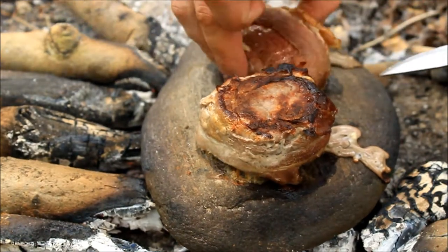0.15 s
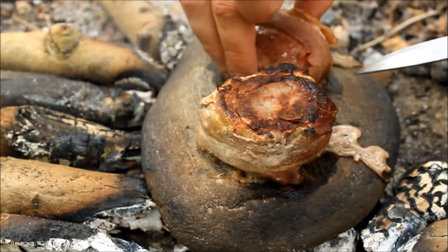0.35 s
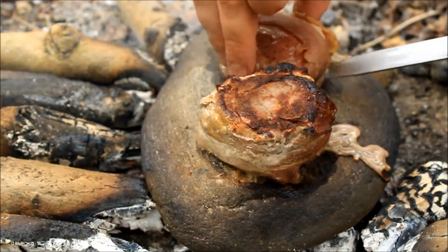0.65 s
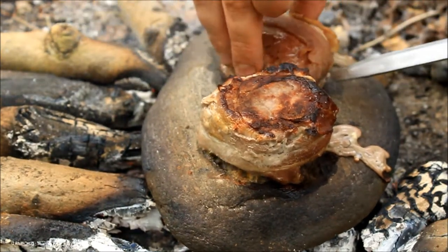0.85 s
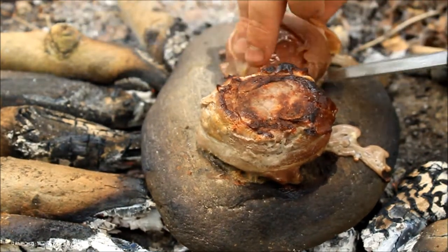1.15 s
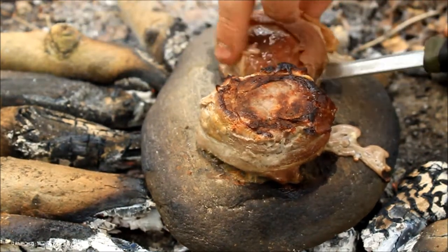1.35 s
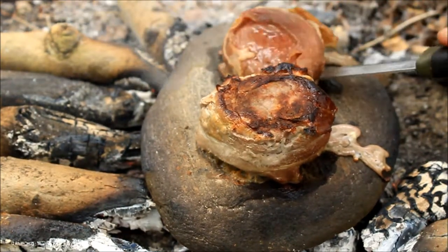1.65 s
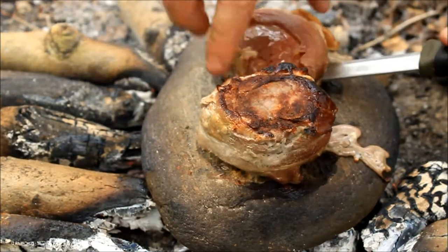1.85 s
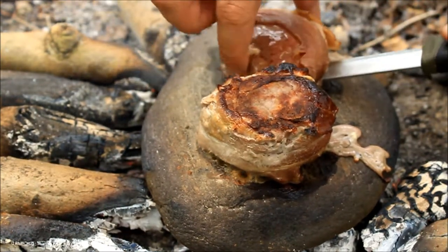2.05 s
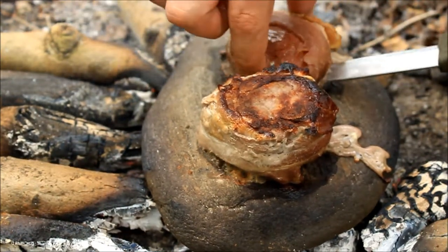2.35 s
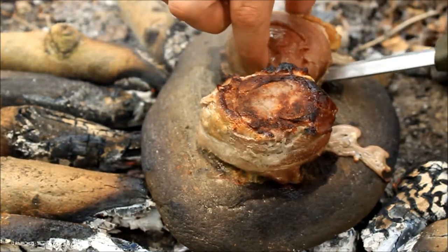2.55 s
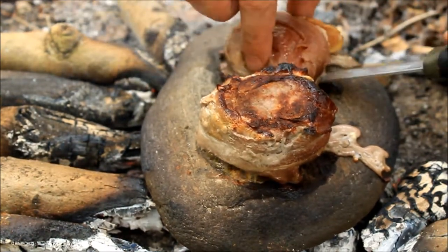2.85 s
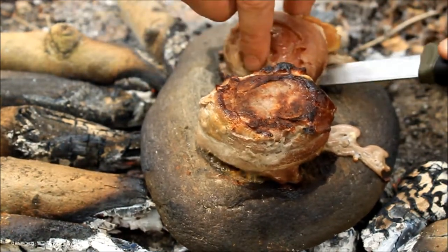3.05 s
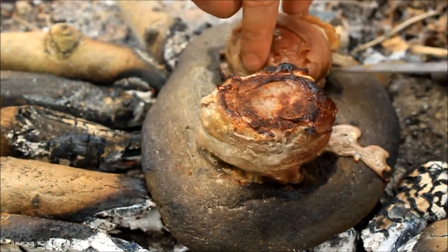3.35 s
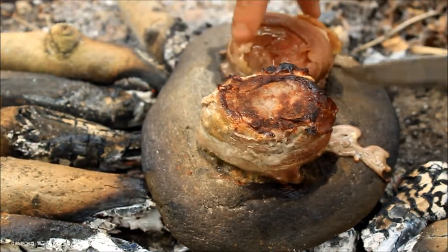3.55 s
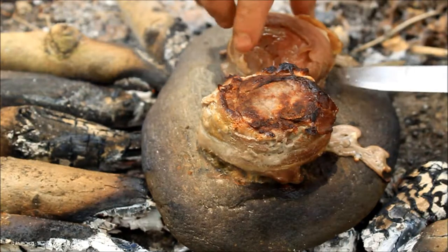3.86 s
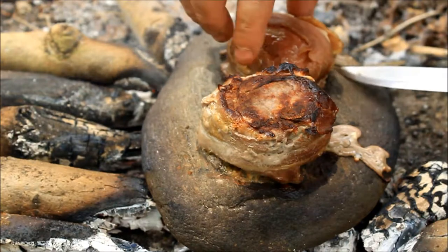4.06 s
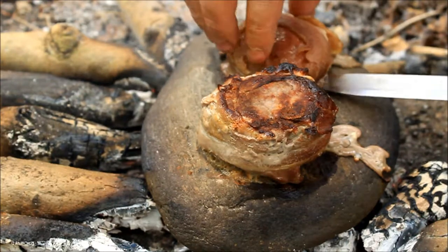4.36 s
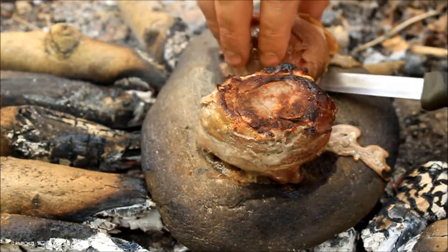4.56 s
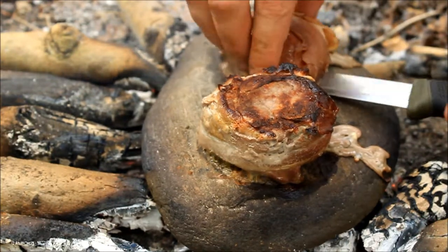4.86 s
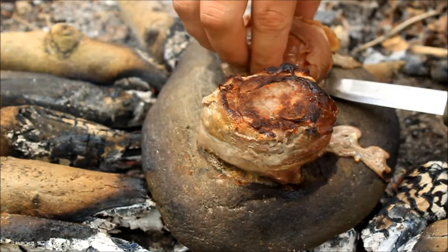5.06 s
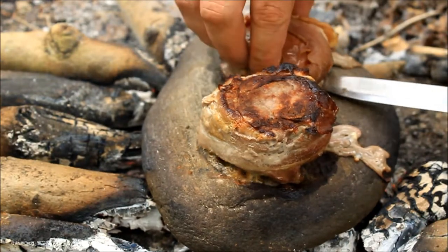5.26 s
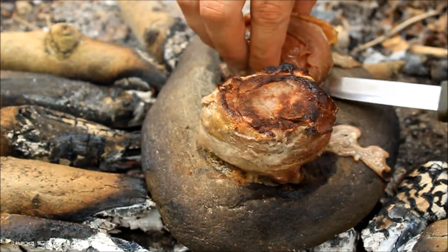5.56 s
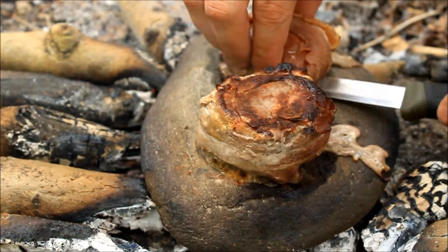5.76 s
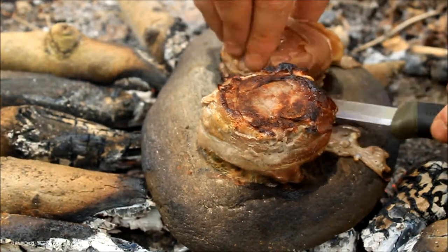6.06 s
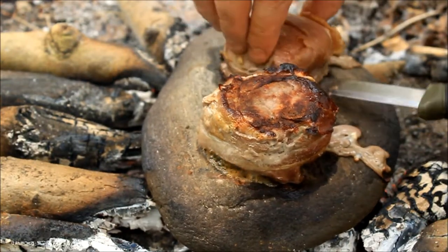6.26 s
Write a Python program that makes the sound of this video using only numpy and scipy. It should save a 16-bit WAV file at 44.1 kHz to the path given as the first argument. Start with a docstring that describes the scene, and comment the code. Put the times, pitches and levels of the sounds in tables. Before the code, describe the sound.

Meat sizzles steadily on a hot stone outdoors, spitting fat and puffing steam, while a knife scrapes briefly and low wind rumbles.

```python
"""Meat fries on a hot stone in the embers of a campfire: from the start, clusters of tiny clicks make bubbling
juice, sizzle and fine spray, with spitting droplets, puffs of steam and flare-ups as the meat is pressed down.
From about 1 s puffs of wind, made of low noise, rumble over a slowly growing breeze and faint outdoor air.
A knife catches on the stone from 1.5 s (clicks ringing in the blade) and its tip ticks twice near 3.7 s (short tones).
From 4.3 s it slides under the meat three times with a low drone of noise, and scrapes hardest near 6 s."""
import sys
import numpy as np
from scipy import signal
from scipy.fft import rfft, irfft, next_fast_len
from scipy.io import wavfile
from scipy.ndimage import uniform_filter1d

SR = 44100
rng = np.random.default_rng(int(sys.argv[2]) if len(sys.argv) > 2 else 0)


def bounce(signal):
    """Save signal as a 16-bit WAV file at the path given by the first command-line argument."""
    frames = np.transpose(np.atleast_2d(signal))
    limited = np.clip(frames, -1, 1)
    pcm = np.round(limited * 32767).astype(np.int16)
    wavfile.write(sys.argv[1], SR, pcm)


N = 283120
TIME = np.arange(N) / SR


def from_db(db):
    """Turn decibels into a gain factor."""
    return 10 ** (np.asarray(db) / 20)


def rms_one(x):
    """Scale the whole sound to an rms of 1."""
    return x / np.sqrt(np.mean(x ** 2) + 1e-20)


def even(x, size=6000):
    """Scale to a running rms of 1 over size samples; the fine grain stays."""
    return x / np.sqrt(uniform_filter1d(x ** 2, size=size) + 1e-20)


def in_time(rows):
    """Draw straight lines between the rows, to get each column at every sample."""
    times, *columns = np.transpose(rows)
    return [np.interp(TIME, times, column) for column in columns]


def swell(start, length, attack_s, release_s):
    """An envelope that rises to 1 at start, holds for length and dies away."""
    early = np.maximum(start - TIME, 0)
    late = np.maximum(TIME - start - length, 0)
    return np.exp(-(early / attack_s) ** 2 - (late / release_s) ** 2)


def bump(peak, length):
    """A bell-shaped envelope of height 1; at half a length from its peak it is 4.3 dB down."""
    return np.exp(-2 * ((TIME - peak) / length) ** 2)


def drift(rate):
    """A smooth random curve of rms about 1 that changes about rate times a second."""
    step = 20  # samples between the computed points
    r = np.exp(-2 * np.pi * rate * step / SR)
    noise = rng.standard_normal(N // step + 2002)
    slow = signal.lfilter([1], [1, -2 * r, r * r], noise)[2000:]  # skip the filter's run-in
    return np.interp(np.arange(N) / step, np.arange(len(slow)), rms_one(slow))


def colour(x, spectrum):
    """Minimum-phase filter through (Hz, dB) points, so nothing sounds early; it falls away below the first."""
    size = next_fast_len(2 * len(x), real=True)
    size += size % 2
    hz = np.maximum(np.fft.rfftfreq(size, 1 / SR), 1)
    at, db = np.transpose(spectrum)
    gain = from_db(np.interp(np.log(hz), np.log(at), db))
    gain = gain * np.minimum(hz / at[0], 1)
    # folding the cepstrum forward in time gives minimum phase
    cepstrum = irfft(np.log(gain))
    cepstrum[1:size // 2] *= 2
    cepstrum[size // 2 + 1:] = 0
    return irfft(rfft(x, size) * np.exp(rfft(cepstrum)))[:len(x)]


def cut(x, hz, kind, order=4):
    """Butterworth filter."""
    sections = signal.butter(order, hz, kind, fs=SR, output="sos")
    return signal.sosfilt(sections, x + 1e-18)


def resonate(x, hz, width_hz):
    """One resonance with a gain of 1 at its top."""
    r = np.exp(-np.pi * width_hz / SR)
    top = np.array([1, 0, -1]) * (1 - r * r) / 2
    bottom = [1, -2 * r * np.cos(2 * np.pi * hz / SR), r * r]
    return signal.lfilter(top, bottom, x + 1e-18)


LARGEST_BURST = 4.6  # limit on a burst's random size, in steps of spread_db


def bursts(per_s, spread_db, clump_db, clump_rate=90):
    """Random clicks, many small and few large, that come in brief clumps."""
    born = rng.random(N) < per_s * from_db(clump_db * drift(clump_rate)) / SR
    sizes = from_db(spread_db * np.minimum(rng.exponential(1, N), LARGEST_BURST))
    signs = rng.choice([-1, 1], N)
    return rms_one(born * sizes * signs)


# colour of the still outdoor air, same on both sides: (frequency [Hz], relative level [dB per Hz])
AIR_COLOUR = [(20, 0.5), (60, -10), (150, -2.5), (330, -3.5), (520, -3), (800, -9), (1500, -12),
              (5000, -39.5)]
# colour of a very faint noise, opposite in left and right: (frequency [Hz], relative level [dB per Hz])
SIDE_NOISE_COLOUR = [(40, -7.5), (130, 7.5), (300, 3), (600, -1), (1100, -15.5), (2200, -34), (4500, -35),
                     (13000, -24)]
AIR_DB, SIDE_NOISE_DB = -72, -86.5


def air():
    """Faint outdoor air, plus very faint noise, opposite in left and right, that widens the sound slightly."""
    mid = rms_one(colour(rng.standard_normal(N), AIR_COLOUR))
    side = rms_one(colour(rng.standard_normal(N), SIDE_NOISE_COLOUR))
    left_right = np.array([[1], [-1]])
    return from_db(AIR_DB) * mid + from_db(SIDE_NOISE_DB) * side * left_right


# colour of the wind's rumble: (frequency [Hz], relative level [dB per Hz])
RUMBLE_COLOUR = [(18, -5), (25, 1), (35, 0), (50, -5.5), (85, -13.5), (130, -24), (250, -42), (600, -82.5)]
# the breeze between the puffs slowly freshens: (time [s], level before flutter [dB])
BREEZE_LEVELS = [(0, -82), (0.9, -78), (3.2, -76.5), (6.42, -68.5)]
# puffs of wind: (time of the peak [s], length [s], level [dB])
WIND_PUFFS = [(0.85, 0.25, -69), (1.47, .05, -64.5), (1.632, 0.086, -60.5), (2.11, 0.12, -59),
              (2.506, 0.22, -61), (3.0, 0.18, -61), (3.427, 0.081, -55.5), (3.54, 0.067, -55.5),
              (3.65, .05, -58), (3.834, 0.17, -52.5), (4.093, .06, -58), (4.46, 0.25, -63.5),
              (4.654, 0.15, -52), (4.837, 0.095, -56), (5.18, 0.13, -47.5), (5.566, 0.32, -59.5),
              (6.02, 0.18, -55), (6.302, 0.088, -57)]
PUFF_RISE_SHARE, PUFF_FALL_SHARE = 0.51, 0.58  # of a puff's length


def wind(flutter_db=3.0):
    """Eddies rumble on the microphone, as strong as the breeze and the puffs that carry them."""
    breeze_db, = in_time(BREEZE_LEVELS)
    breeze = from_db(breeze_db + flutter_db * drift(6))
    puffs = sum(from_db(db) * swell(peak, 0, PUFF_RISE_SHARE * length, PUFF_FALL_SHARE * length)
                for peak, length, db in WIND_PUFFS)
    rumble = even(colour(rng.standard_normal(N), RUMBLE_COLOUR), size=3000)
    return np.hypot(breeze, puffs) * rumble


# the blade slides under the meat: (start [s], length [s], level [dB], pitch [Hz])
BLADE_SLIDES = [(4.287, 0.18, -71, 685), (5.274, 0.6, -70.5, 498), (6.13, .21, -69, 508.5)]
SLIDE_ATTACK_S, SLIDE_RELEASE_S = 0.069, 0.055


def rub(width_hz=75, judder_db=2.5):
    """The sliding blade drones: uneven friction, as narrow noise around one pitch for each slide."""
    noise = rng.standard_normal(N) + 1j * rng.standard_normal(N)
    shake = cut(noise, width_hz, "low", order=2)
    shake = shake * from_db(judder_db * drift(7.4))
    out = np.zeros(N)
    for start, length, db, hz in BLADE_SLIDES:
        drone = rms_one(np.real(shake * np.exp(2j * np.pi * hz * TIME)))  # moves the noise up to the pitch
        out += from_db(db) * swell(start, length, SLIDE_ATTACK_S, SLIDE_RELEASE_S) * drone
    return out


# ticks of the knife tip: (time [s], starting level [dB])
KNIFE_TICKS = [(3.6727, -32), (3.678, -38)]
TICK_HZ, TICK_T60_S = 7200, 0.0036  # pitch; time to fade by 60 dB


def ticks():
    """The knife tip touches the stone and rings for an instant."""
    out = np.zeros(N)
    for start, db in KNIFE_TICKS:
        fade = from_db(db - 60 * np.abs(TIME - start) / TICK_T60_S)
        out += fade * np.sin(2 * np.pi * TICK_HZ * np.maximum(TIME - start, 0))  # silent before start
    return out


# the blade catches on the stone: (time of the peak [s], relative level [dB], length [s])
BLADE_SCRAPES = [(1.46, -57, .008), (3.141, -50, .005), (4.22, -51, .02), (4.308, -44.5, .012),
                 (5.507, -49.5, .011), (5.71, -52, .012), (5.947, -45, .007), (5.958, -39.5, .005),
                 (5.969, -31.5, .0035), (5.983, -29.5, .0016), (5.988, -33.5, .0035), (5.995, -46, .02),
                 (6.002, -38, .0018), (6.094, -46, .005), (6.131, -44.5, .014)]
# resonances of the scraping blade: (frequency [Hz], width [Hz], relative level [dB])
BLADE_RESONANCES = [(713, 128, -2.5), (1330, 480, 0), (1510, 330, -21.5), (2225, 540, 1), (3550, 370, -1.5),
                    (4390, 1400, -7), (5570, 270, -6), (7550, 270, -11), (10700, 2100, -31)]


def scrapes(lowest_hz=480):
    """In each short slip the edge jumps over grains of stone and shakes the blade, too narrow to radiate bass."""
    force = sum(from_db(db) * bump(peak, length) for peak, db, length in BLADE_SCRAPES)
    grit = force * bursts(per_s=12000, spread_db=3.0, clump_db=1.0)
    blade = sum(from_db(db) * resonate(grit, hz, width) for hz, width, db in BLADE_RESONANCES)
    return from_db(4.0) * cut(blade, lowest_hz, "high", order=3)


# the meat left to itself: (time [s], sizzle level [dB], juice level [dB], relative level of fat spray [dB])
SIMMER_LEVELS = [(0, -53.5, -61.5, -58.5), (1.0, -53.5, -61, -58.5), (1.6, -55.5, -61, -61.5),
                 (2.15, -55.5, -64.5, -61.5), (3.4, -55.5, -60, -60.5), (4.6, -55, -61, -58.5),
                 (5.9, -56, -60, -61.5), (6.42, -56.5, -60, -61.5)]
# fingers or blade press the meat onto the stone and the frying changes, mostly flaring up:
# (time of the peak [s], rise [s], fall [s], sizzle gain [dB], juice gain [dB], spray gain [dB])
MEAT_PRESSES = [(0.2, 0.3, 0.3, 3.5, 1, -1), (0.6, 0.086, 0.15, 1.3, 4, 2.5),
                (1.04, 0.045, 0.075, 0.5, 1.5, 0.5), (1.9, .05, .06, 1.5, -1, 3.5),
                (2.78, 0.42, 0.11, 2, 3, 1.5), (3.05, 0.26, .13, 4, 3.5, 3),
                (4.05, 0.042, 0.05, 4.5, -0.2, 3), (4.24, 0.045, 0.13, 2.5, 4.5, 3.5),
                (5.12, .07, 0.22, -1, 3.5, 0), (5.53, 0.055, 0.07, 0, 0.5, 5), (6.31, 0.071, .2, 6, 2, 1)]


def frying():
    """Levels of sizzle, juice and spray in dB: the simmer, changed by each press."""
    levels_db = np.array(in_time(SIMMER_LEVELS))
    for peak, rise, fall, *gains_db in MEAT_PRESSES:
        levels_db = levels_db + np.outer(gains_db, swell(peak, 0, rise, fall))
    return levels_db


SMALL_SPITS_PER_S = 22
SMALL_SNAP_DB, SMALL_CRACK_DB, SMALL_SPREAD_DB = -1.5, -3.5, 4.5  # offsets from the sizzle level; random spread
SNAP_DB_PER_JUICE_DB = 0.6  # wet meat snaps harder


def small_spits(count=240):
    """Small droplets spit at random, louder the harder the meat fries: rows (s, snap dB, bright crack dB)."""
    sizzle_db, juice_db, _ = frying()
    wetness_db = juice_db - np.mean(juice_db)
    times = np.cumsum(rng.exponential(1 / SMALL_SPITS_PER_S, count))
    chance_db = SMALL_SPREAD_DB * np.clip(rng.standard_normal((2, count)), -2, 2)
    wet_sizzle_db = sizzle_db + SNAP_DB_PER_JUICE_DB * wetness_db
    snap_db = np.interp(times, TIME, wet_sizzle_db) + SMALL_SNAP_DB + chance_db[0]
    crack_db = np.interp(times, TIME, sizzle_db) + SMALL_CRACK_DB + chance_db[1]
    return list(np.column_stack([times, snap_db, crack_db])[times < TIME[-1]])


# the larger spitting droplets, levels as rms over SPIT_S: (time [s], snap level [dB], bright crack level [dB])
LARGE_SPITS = [(0.1444, -44, -49), (0.1933, -44, -57), (0.3722, -45, -60), (0.6677, -50, -62),
               (0.8878, -41.5, -45), (0.9744, -52, -47), (1.0183, -64, -48), (1.0413, -50, -47),
               (1.0743, -50, -48), (1.3232, -45.5, -62), (1.3384, -61, -46), (1.9257, -55, -44.5),
               (2.0808, -46.5, -54), (2.401, -48, -38), (2.43, -47, -44), (2.8042, -43.5, -55),
               (2.8764, -44, -64), (2.9504, -42, -57), (2.998, -43, -45), (3.1017, -45.5, -64),
               (3.2301, -48, -65), (3.4262, -46, -51), (3.5233, -45, -62), (3.7949, -44, -50),
               (4.4673, -52, -49), (4.6344, -46, -45.5), (4.8763, -49, -65), (4.963, -41, -37),
               (5.0772, -43, -46.5), (5.087, -50, -46), (5.5248, -58, -45), (6.06, -60, -47.5),
               (6.3977, -43, -49)]
SPIT_S = 0.003


def spits(tear_db=-7, tear_s=0.000059, splash_db=-19.0, splash_s=0.0021,
          snap_top_hz=7000, crack_from_hz=9000, size=1024):
    """A droplet's skin tears with one sharp snap, and a short splash of smaller ones follows."""
    out = np.zeros(N + size)
    age = np.arange(size) / SR
    fade = from_db(tear_db) * np.exp(-age / tear_s) + from_db(splash_db) * np.exp(-age / splash_s)
    for time, snap_db, crack_db in LARGE_SPITS + small_spits():
        push = fade * rng.standard_normal(size) * (rng.random(size) < 0.4)
        push[0] = rng.choice([-1, 1])  # the first snap
        push = colour(push, SIZZLE_COLOUR)
        start = round(time * SR)
        for kind, hz, db in (("low", snap_top_hz, snap_db), ("high", crack_from_hz, crack_db)):
            part = cut(push, hz, kind)
            to_rms_one = np.sqrt(SPIT_S * SR / np.sum(part ** 2))
            out[start:start + size] += from_db(db) * part * to_rms_one
    return out[:N]


# steam squeezed out from under the meat:
# (time of the peak [s], level [dB], length [s], pitch of the gap [Hz], width of the resonance [Hz])
STEAM_JETS = [(0.174, -59, 0.59, 2360, 700), (2.713, -61.5, 0.22, 1540, 348), (2.885, -58, 0.67, 2070, 500),
              (3.03, -58, 0.11, 7200, 1100), (3.057, -61, .08, 11800, 1100), (4.2, -60.5, .2, 10700, 1300),
              (4.264, -61, 0.32, 5760, 330), (6.135, -53.5, 0.097, 1880, 497),
              (6.147, -57.5, 0.33, 5350, 300), (6.286, -49, 0.34, 2360, 1020)]


def jets():
    """Steam sputters through a gap in the fat, swells and dies; the gap's resonance colours the froth."""
    out = np.zeros(N)
    for peak, db, length, hz, width in STEAM_JETS:
        froth = bursts(per_s=1000, spread_db=3.5, clump_db=1.5)
        # two wider resonances in a row come out about as narrow as width
        once = resonate(froth, hz, 1.5 * width)
        hiss = even(resonate(once, hz, 1.5 * width))
        out += from_db(db) * bump(peak, length) * hiss
    return out


def bubbles(clicks, low_hz, high_hz, cycles, count=20):
    """Each bubble rings for a few cycles as it opens, at one of count pitches dealt at random."""
    dealt = rng.integers(0, count, N)
    pitches = np.geomspace(low_hz, min(high_hz, 0.45 * SR), count)
    return rms_one(sum(resonate(clicks * (dealt == k), hz, hz / cycles) for k, hz in enumerate(pitches)))


# colour of bursting bubbles, also used for the spits: (frequency [Hz], relative level [dB per Hz])
SIZZLE_COLOUR = [(400, -21), (900, -13), (1060, -6.5), (1650, -7.5), (2200, -3), (3100, -1), (3650, 2),
                 (4400, -1.5), (5450, 3), (6900, -5.5), (8500, -11), (10900, -6.5), (14000, -7.5),
                 (15800, -11)]
JUICE_TOP_HZ, SPRAY_FROM_HZ = 2440, 9100


def sizzle(crackle_db_per_db=-0.2):
    """Steam bubbles burst in the fat: coarse in the juice, finest in the spray, with snaps through all bands."""
    sizzle_db, juice_db, spray_db = frying()
    wetness_db = juice_db - np.mean(juice_db)
    # the more juice there is, the less the snaps stand out of the fizz
    snaps = from_db(crackle_db_per_db * wetness_db) * bursts(per_s=600, spread_db=3.0, clump_db=1.0)
    fizz = bursts(per_s=14000, spread_db=2.5, clump_db=1.5)
    coarse = bubbles(bursts(per_s=700, spread_db=2.5, clump_db=2.5), 1160, 3000, cycles=6.9)
    middle = bubbles(bursts(per_s=1500, spread_db=3.0, clump_db=2.0), 2680, 7360, cycles=5.0)
    fine = bubbles(bursts(per_s=1500, spread_db=3.5, clump_db=2.5), 8000, 15500, cycles=3.0)

    juice_mix = fizz + from_db(-1.0) * snaps + from_db(-12.0) * coarse
    hiss_mix = fizz + from_db(-3.0) * snaps + from_db(-8.5) * middle
    spray_mix = fizz + from_db(-4.0) * snaps + from_db(-2.5) * fine
    juice = cut(colour(juice_mix, SIZZLE_COLOUR), JUICE_TOP_HZ, "low")
    hiss = cut(colour(hiss_mix, SIZZLE_COLOUR), [JUICE_TOP_HZ, SPRAY_FROM_HZ], "band")
    spray = cut(colour(spray_mix, SIZZLE_COLOUR), SPRAY_FROM_HZ, "high")

    out = from_db(sizzle_db) * even(hiss)
    out += from_db(juice_db) * even(juice)
    out += from_db(spray_db + 0.2) * even(spray)
    return out


def scene():
    """All sources sit in the centre, a very faint noise differs between the sides; there is no reverberation."""
    meat = sizzle() + jets() + spits()
    knife = scrapes() + ticks() + rub()
    return meat + knife + wind() + air()


CUTOFF_HZ = 15850


def record(dry):
    """Cut the top steeply with an elliptic low-pass filter."""
    sections = signal.ellip(10, 0.1, 80, CUTOFF_HZ, fs=SR, output="sos")
    return signal.sosfilt(sections, dry)


dry = scene()
out = record(dry)
bounce(out)
```